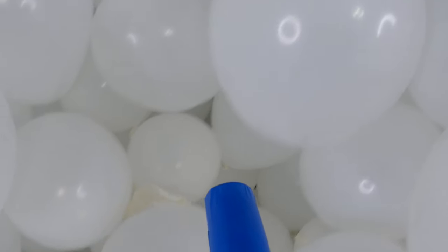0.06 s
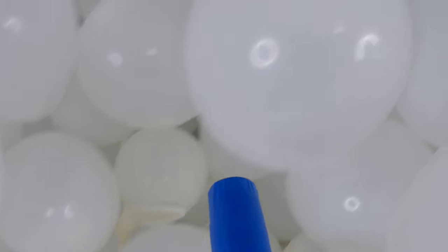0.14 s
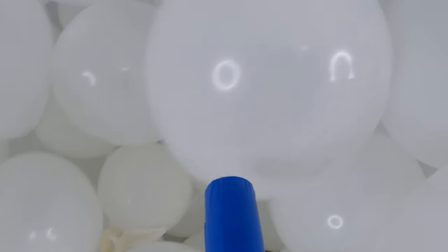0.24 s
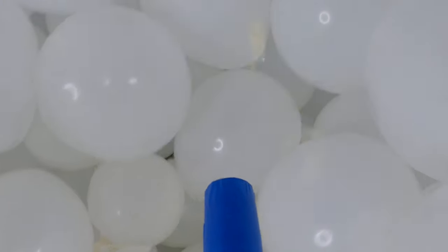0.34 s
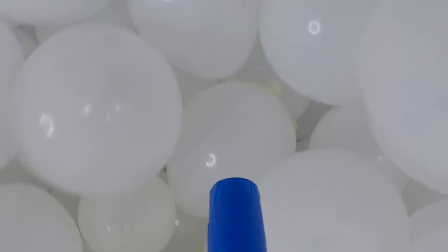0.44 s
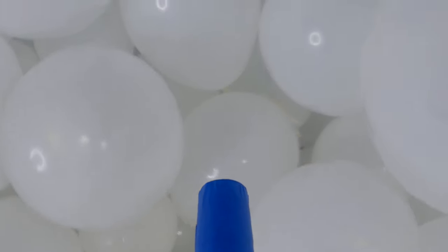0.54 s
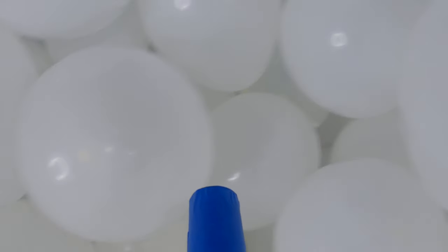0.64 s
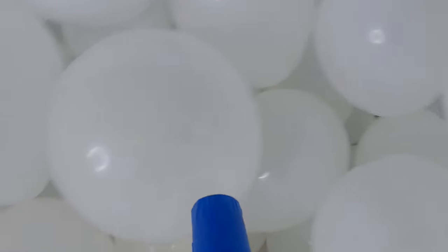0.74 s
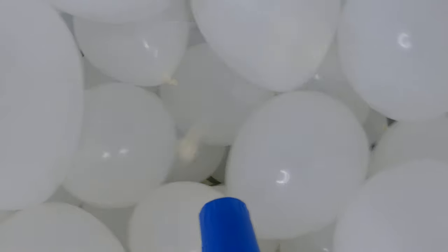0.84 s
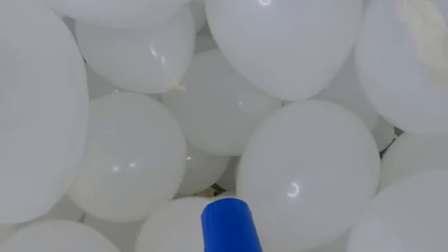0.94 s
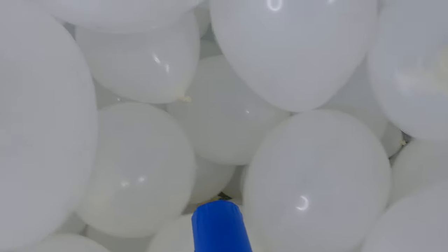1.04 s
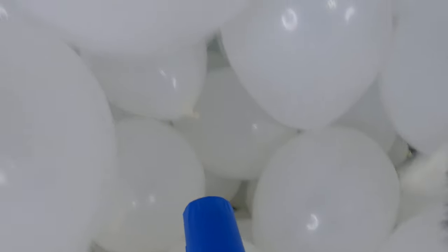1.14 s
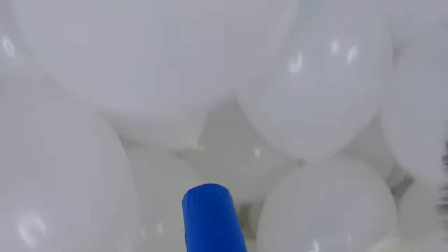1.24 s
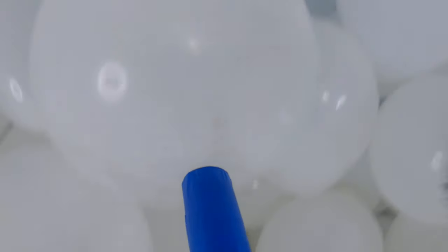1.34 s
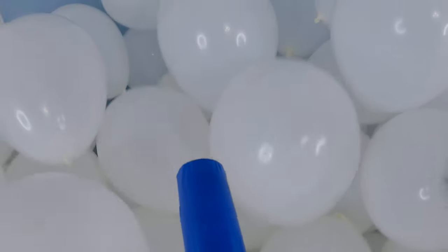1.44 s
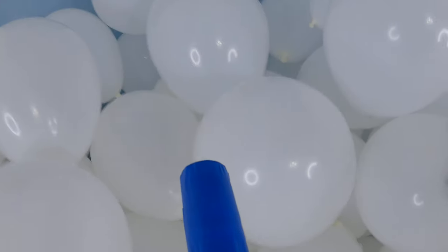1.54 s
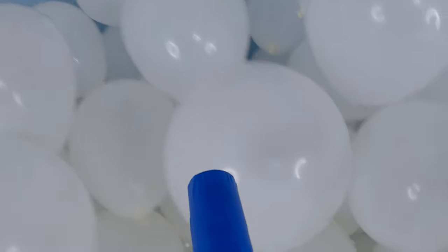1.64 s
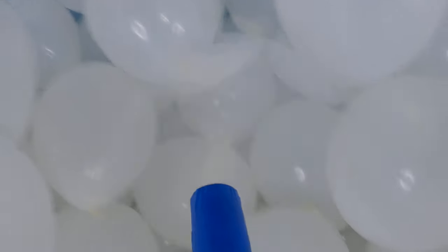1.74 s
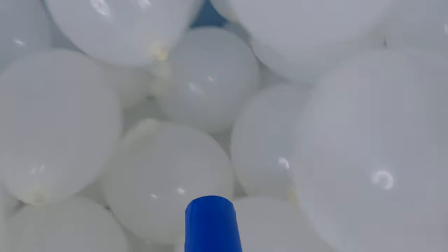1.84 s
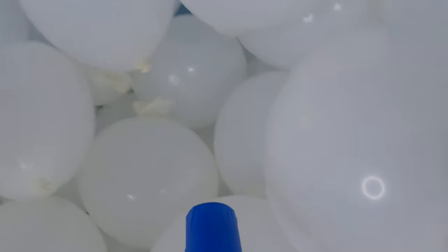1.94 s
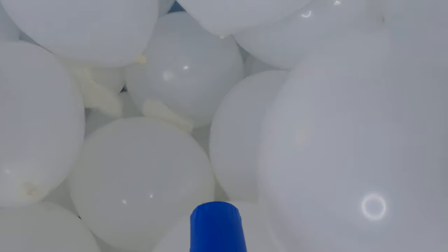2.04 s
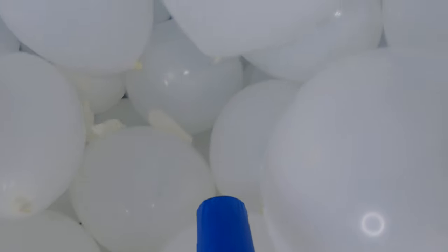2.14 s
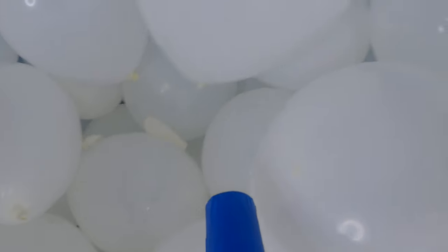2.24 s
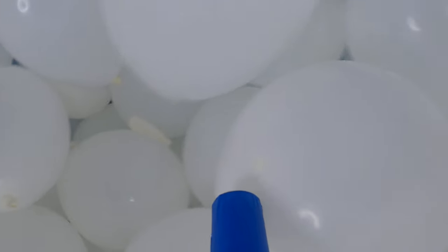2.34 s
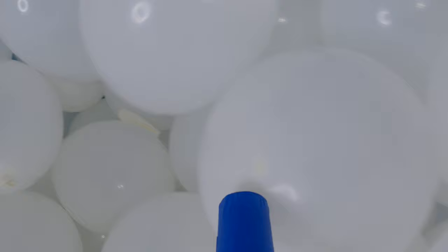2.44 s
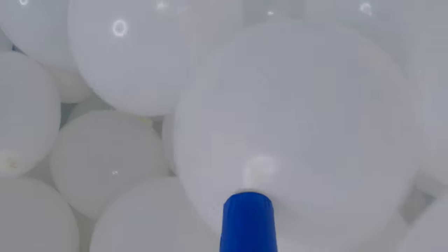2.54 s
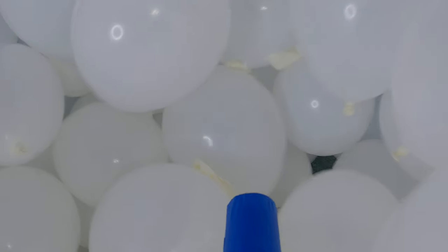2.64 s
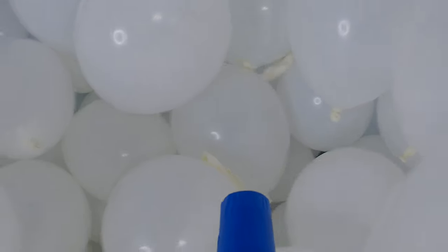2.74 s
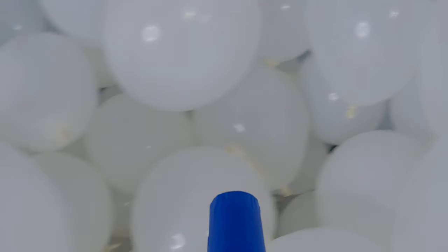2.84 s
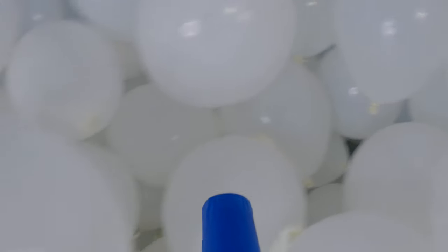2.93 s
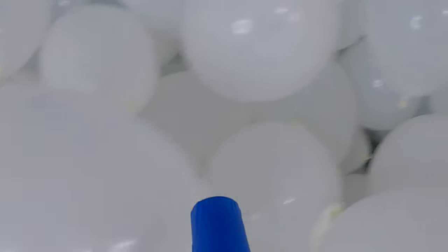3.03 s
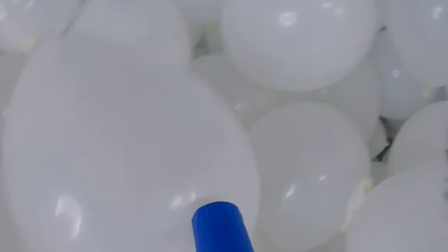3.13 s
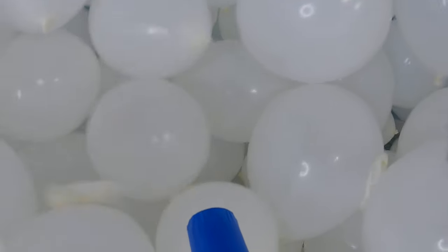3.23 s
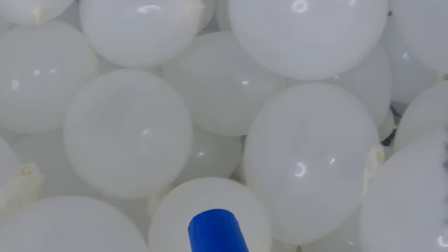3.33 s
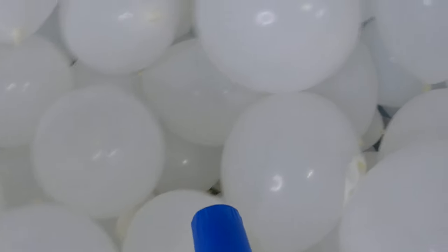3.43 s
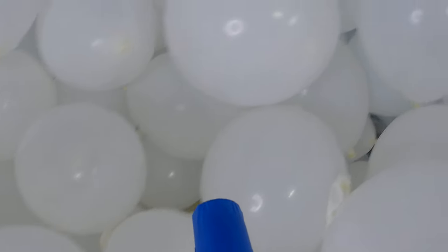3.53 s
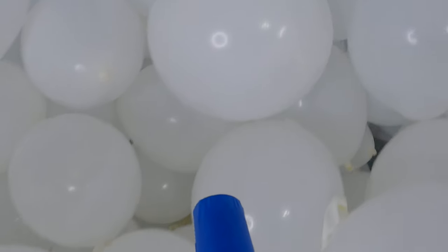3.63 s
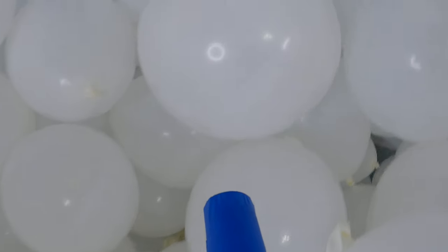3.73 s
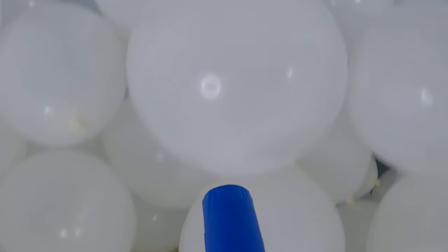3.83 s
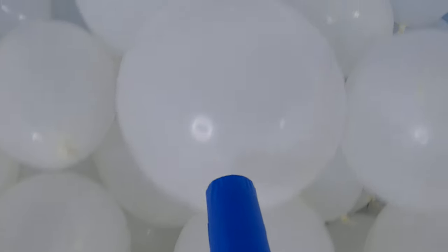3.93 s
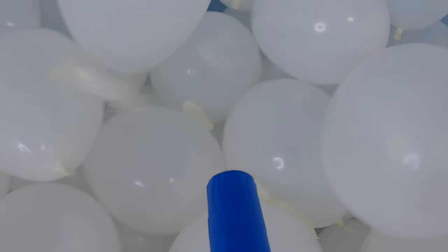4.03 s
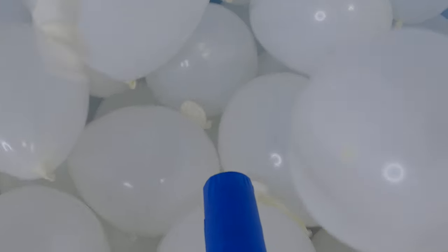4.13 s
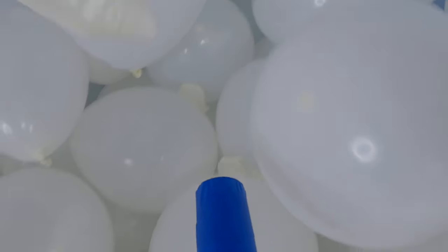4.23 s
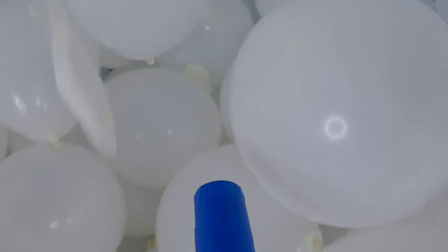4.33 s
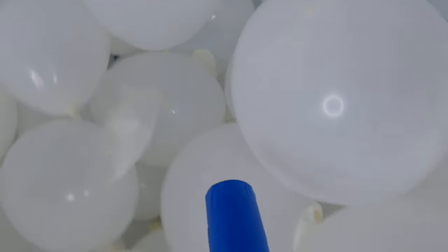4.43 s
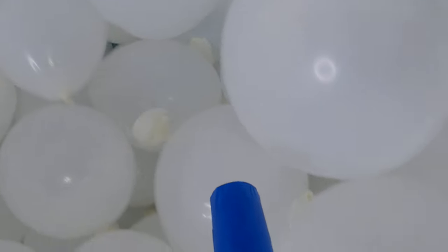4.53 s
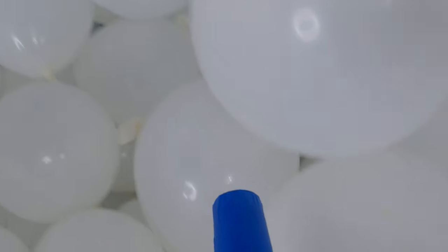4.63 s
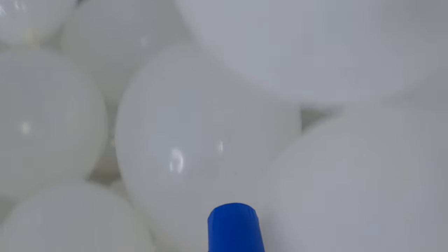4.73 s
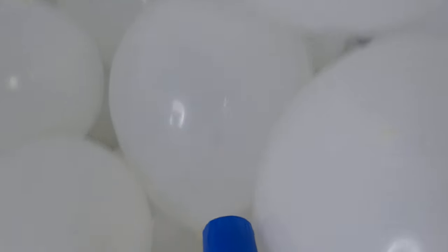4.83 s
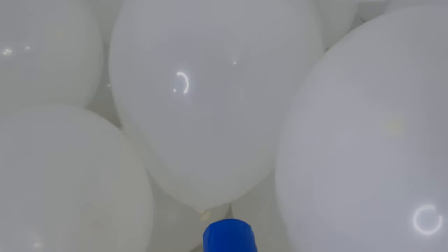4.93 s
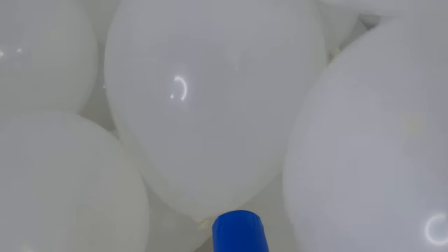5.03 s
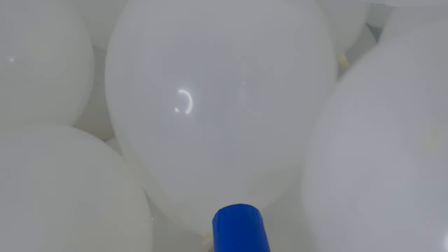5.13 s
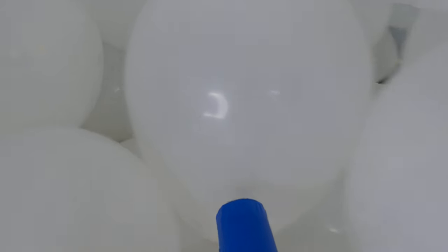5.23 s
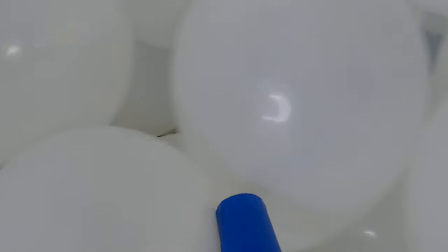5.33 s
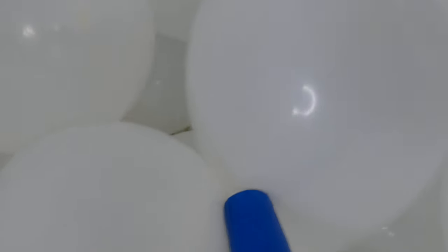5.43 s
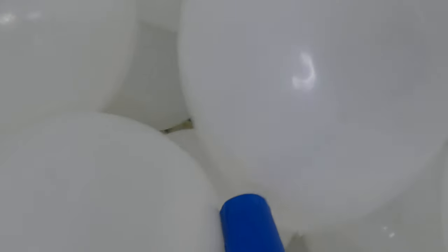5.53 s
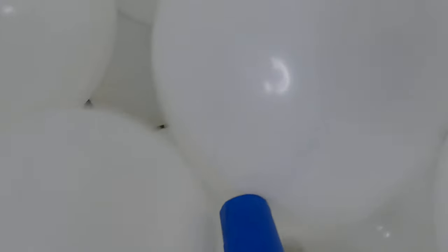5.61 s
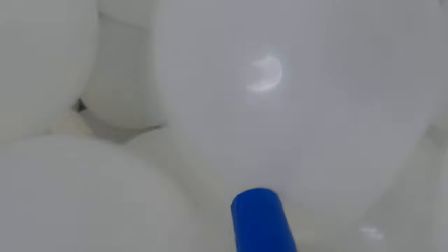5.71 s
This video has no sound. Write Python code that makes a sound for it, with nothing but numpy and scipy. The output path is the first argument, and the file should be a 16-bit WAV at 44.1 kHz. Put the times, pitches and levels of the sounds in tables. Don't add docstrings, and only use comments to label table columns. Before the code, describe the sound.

Hissing shop-vacuum suction with faint thin whistles, heard very near and nearly mono. Balloons burst singly at its rim over about four seconds, hard, slightly overloaded cracks with low booms and hollow echoes from surrounding balloons. Automatic gain pulls the hiss down around each pop, then lets it recover. After a longer stretch of suction, rubber slaps, short rising squeaks and growing low gusts close the scene.

```python
import sys
import numpy as np
from scipy import signal
from scipy.fft import rfft, irfft, next_fast_len
from scipy.io import wavfile
from scipy.ndimage import uniform_filter1d, map_coordinates

SR = 44100
rng = np.random.default_rng(int(sys.argv[2]) if len(sys.argv) > 2 else 0)


def gain_from_db(level_db):
    decades = np.asarray(level_db, float) / 20
    return 10 ** decades


def persist_wave(psi):
    counts = np.round(np.clip(psi, -1, 1) * 32767).astype(np.int16)
    wavfile.write(sys.argv[1], SR, np.atleast_2d(counts).T)


N = 254456


def shock(u):
    return (u > 0) * (1 - u) * np.exp(-u)


def tear(t, lag, gulp_hz):
    late = np.clip(lag, 0, None)
    shreds = unit(filtered(rng.standard_normal(len(t)), lambda f: 1 / (1 + (f / 9500) ** 4)))
    jolt = gain_from_db(-7) * shock(t / .0003) + gain_from_db(-10.5) * shreds * gain_from_db(-60 * t / .012)
    gulp = gain_from_db(-3 + 9 * np.log2(gulp_hz / 500)) * ring(t, gulp_hz, t60=0.03, attack=0.00013)
    snap = shock(late / 0.0014)
    crackle = gain_from_db(-6.5) * (late > 0) * shreds * gain_from_db(-60 * late / 0.03)
    crack = gain_from_db(-3) * (snap + crackle)
    heave_shape = np.exp(-np.where(lag < 0, (lag / .001) ** 2, lag / .003))
    heave = gain_from_db(-6.5) * np.cos(2 * np.pi * 270 * lag) * heave_shape
    return jolt + gulp + crack + heave


# (f/Hz, level/dB)
HEAP = [(180, -6), (300, -1), (405, -13.5), (636, 0), (752, -2), (1100, -7), (1420, -7.5), (2380, -13.5),
        (2910, -12.5), (3440, -16.5), (7790, -19), (14000, -27), (16200, -45)]
# (f/Hz, t60/s)
HEAP_T60 = [(300, 0.15), (800, 0.12), (1400, 0.36), (2500, 0.42), (6000, 0.37), (14000, 0.22)]


def heap(t):
    hz, frame, z = signal.stft(rng.standard_normal(len(t)), SR, nperseg=128)
    z = z * gain_from_db(-60 * frame / along(HEAP_T60, hz)[:, None])
    x = signal.istft(z, SR, nperseg=128)[1][:len(t)]
    x = filtered(x, lambda f: gain_from_db(along(HEAP, f)))
    return x / np.sqrt(np.mean(x[:SR // 50] ** 2))


def heap_answer(t, lag, gap_hz, boom_db, thud_db, skin_db, gap_db):
    late = np.clip(lag, 0, None)
    swell = np.where(late > 0, 1 - 0.66 * np.exp(-late / 0.001), .25)
    clumps = gain_from_db(1.85 * unit(uniform_filter1d(rng.standard_normal(len(t)), size=90)))
    echoes = gain_from_db(-12.5) * swell * clumps * heap(t)
    boom = gain_from_db(boom_db + 8.5) * ring(late, 86, t60=0.14, attack=0.00062)
    skin = gain_from_db(skin_db + 6) * ring(late, 270, t60=0.17, attack=0.0031)
    sag = lambda f: 1 / (1 + (125 / (f + 1)) ** 6) / (1 + (f / 235) ** 6)
    thud = gain_from_db(thud_db + 4) * swell * band(t, sag, t60=0.15)
    cavity = lambda f: 1 / (1 + ((f - gap_hz) / 204) ** 2)
    hollow = gain_from_db(gap_db - 5) * swell * band(t, cavity, t60=0.32)
    return echoes + hollow + boom + thud + skin


# (first jolt t/s, crack t/s, gulp f/Hz, hollow f/Hz)
BURSTS = [
    (.4258, .4286, 500, 1300),
    (.9511, .9545, 420, 1270),
    (1.4703, 1.4731, 520, 1600),
    (1.8588, 1.862, 400, 1600),
    (2.6818, 2.685, 450, 1350),
    (3.2876, 3.2908, 330, 1450),
    (4.1063, 4.1106, 300, 1750),
]
# (peak level/dB, boom level/dB, thud level/dB, skin ring level/dB, hollow level/dB)
ANSWERS = [
    (-2.5, -11, -20, -24.5, -17.5),
    (-4, -22, -11.5, -11, -12),
    (-2.5, -21, -19.5, -21, -14),
    (-2.5, -14, -15, -22, -10),
    (-2.5, -14.5, -13, -23, -17),
    (-1.5, -32.5, -18.5, -16, -10.5),
    (-2.5, -28, -20, -24, -10.5),
]


def bursts():
    out, t = np.zeros(N), np.arange(SR // 2) / SR
    for (s, crack_s, gulp_hz, gap_hz), (db, *answer_db) in zip(BURSTS, ANSWERS):
        lag = t - (crack_s - s)
        pop = tear(t, lag, gulp_hz) + heap_answer(t, lag, gap_hz, *answer_db)
        add(out, s, gain_from_db(db) * pop)
    earlier_age_s = .09
    add(out, 0, gain_from_db(-15) * heap(t)[round(earlier_age_s * SR):])
    return out


# (t/s, peak level/dB, f/Hz, t60/s, snap
# level/dB)
THUMPS = [(0.53, -17.5, 135, 0.084, -20), (0.9646, -6.5, 1410, 0.028, -9), (1.4566, -3.5, 141, 0.035, -24),
          (2.436, -25, 93.5, 0.066, -22), (2.6423, -18, 220, 0.18, 3), (5.452, -22, 1000, .04, -4),
          (5.493, -20, 86, 0.1, -25), (5.578, -20, 76.6, 0.42, -25), (5.647, -8.5, 86, 0.14, -23),
          (5.732, -13, 80.6, 0.12, -22), (5.757, -14, 90, .1, -20)]


def thumps():
    out, t = np.zeros(N), np.arange(SR // 4) / SR
    for s, db, hz, t60, snap_db in THUMPS:
        push = ring(t, hz, t60, attack=0.00099)
        snap = gain_from_db(snap_db) * band(t, lambda f: 1 / (1 + (f / 9000) ** 4), t60=0.043)
        add(out, s, gain_from_db(db) * (push + snap))
    return out


# (t/s, peak level/dB, f/Hz, length/s, pitch rise/share)
SQUEALS = [
    (5.503, -7.5, 2230, 0.023, 0.083),
    (5.551, -9, 2364, 0.0245, 0.045),
    (5.609, -10.5, 2960, 0.0214, 0.037),
    (5.7115, -8.5, 3235, .016, 0.011),
]


def squeals():
    out, t = np.zeros(N), np.arange(SR // 5) / SR
    hiss_colour = [(1400, -15.5), (2000, -7), (3400, -2), (4050, 1.5), (4800, -3), (6500, -3),
                   (12000, -15.5), (15500, -21), (16500, -70)]
    for s, db, hz, length, rise in SQUEALS:
        turn = 2 * np.pi * np.cumsum(hz * (1 + rise * np.clip(t / length, 0, 2.2))) / SR
        shake = [unit(filtered(rng.standard_normal(len(t)), lambda f: 1 / (1 + (f / 230) ** 2)))
                 for _ in range(2)]
        rasp = shake[0] * np.cos(turn) + shake[1] * np.sin(turn)
        voice = 0.94 * np.cos(turn) + 0.5 * rasp
        hiss = unit(filtered(rng.standard_normal(len(t)), lambda f: gain_from_db(along(hiss_colour, f))))
        fade_in = np.clip(t / 0.0022, 0, 1)
        cut = np.clip((length - t) / 0.0062 + 1, 0, 1)
        on = fade_in * cut * gain_from_db(-3 * t / length)
        after = np.clip(t / length, 0, 1) * gain_from_db(-60 * t / .3)
        tone = voice * on + gain_from_db(-3.5) * rasp * after
        air = gain_from_db(-3.5) * hiss * (on + gain_from_db(-2.5) * after)
        add(out, s, gain_from_db(db - 6.5) * (tone + air))
    return out


def suction():
    jet_db, fizz_db = seals()
    flutter = wobble(22)
    rim = jet(flutter) + fizz(flutter, fizz_db) + motor(fizz_db) + whistles()
    return gain_from_db(gain_db()) * (gain_from_db(-21.3 + jet_db) * rim + wind())


# (t/s, rise/s, jet level/dB, fizz level/dB)
SEALS = [
    (0.405, .04, 2, 0),
    (2.62, .07, 4, 7),
    (2.645, .035, -4, 18),
    (2.68, .02, 7, 3),
    (3.27, .1, 2, 3),
    (5.47, .2, -.5, 3),
]


def seals():
    t = np.arange(N) / SR
    near = np.array([np.interp(t, [s - rise, s, s + .05], [0, 1, 0]) for s, rise, *_ in SEALS])
    return np.array(SEALS)[:, 2:].T @ near


# (f/Hz, level/dB)
JET = [(880, -44), (1500, -19), (2120, -13), (2640, -6), (2860, -3.5), (3230, -1.5), (3700, 0.5),
       (4880, -10), (6310, -21), (7000, -61.5), (9100, -102), (15400, -120)]


def jet(flutter):
    return gain_from_db(1.2 + 0.31 * flutter + 0.37 * wobble(40)) * hose(patchy_noise(JET, patchy_db=0.93))


# (f/Hz, level/dB)
FIZZ = [(3060, -41), (5200, -10), (6290, -3.5), (7290, -8.5), (9710, -4), (10900, -11.5), (13400, -12),
        (15100, -22), (16200, -45)]


def fizz(flutter, seal_db):
    return gain_from_db(-9.7 + seal_db + .6 * flutter) * hose(patchy_noise(FIZZ, patchy_db=.9))


# (f/Hz, level/dB)
RUSH = [(120, -32), (200, -10), (270, -7.5), (591, -8.5), (644, -3.5), (1880, -8), (2600, -8.5),
        (3380, -27), (5720, -120)]


def motor(seal_db):
    return gain_from_db(-9.3 + .5 * seal_db + .8 * wobble(9)) * hose(patchy_noise(RUSH, patchy_db=0.5))


# (delay/s, share)
HOSE = [
    (.0112, 0.41),
    (0.0077, 0.14),
    (.0035, 0.05),
]


def hose(x):
    def comb(hz):
        echoes = sum(np.clip(g, 0, .33) * np.exp(-2j * np.pi * hz * s) for s, g in HOSE)
        return 1 / (1 - echoes)
    return unit(filtered(x, comb))


# (start t/s, end t/s, f/Hz, level/dB re jet)
WHISTLES = [
    (0.15, 0.3, 370, -9),
    (0.681, 0.858, 2730, -2),
    (2.443, 2.6, 2680, -4.5),
    (3.489, 3.718, 2670, -1.5),
    (4.8, 4.953, 3310, -2),
    (5.15, 5.3, 3240, -2),
]


def whistles():
    out = np.zeros(N)
    for start, end, hz, db in WHISTLES:
        size = round((end - start) * SR)
        pitch = hz * (1 + 0.0026 * wobble(31)[:size])
        tone = np.sin(2 * np.pi * np.cumsum(pitch) / SR)
        add(out, start, gain_from_db(db) * np.sqrt(np.hanning(size)) * tone)
    return out


# (start t/s, depth level/dB)
DUCKS = [(-0.12, 19.5), (0.408, 20.5), (0.938, 20), (1.453, 20.5), (1.843, 22), (2.661, 22), (3.273, 20.5),
         (4.093, 20.5), (5.488, 11), (5.546, 14), (5.61, 17)]


def gain_db():
    fall_s, hold_s = .012, .19
    quick_share, quick_s, creep_s = .39, .15, 1.4
    t, ducks = np.arange(N) / SR, []
    for s, depth_db in DUCKS:
        since = np.clip(t - s - hold_s, 0, None)
        quick = quick_share * np.exp(-since / quick_s)
        creep = (1 - quick_share) * np.clip(1 - since / creep_s, 0, 1)
        ducks.append(depth_db * np.clip((t - s) / fall_s, 0, 1) * (quick + creep))
    return -np.max(ducks, axis=0)


# (f/Hz, level/dB)
LUMPS = [(21, -52), (35, -26), (56, -15.5), (81, 0), (178, -13), (200, -20), (260, -39), (440, -120)]
# (f/Hz, level/dB)
FLAPS = [(82, -12), (140, 4.5), (440, -2.5), (472, -8), (839, -14), (900, -43), (1170, -37), (1980, -120)]
# (t/s, level/dB)
STREAM = [(0, -33), (.25, -38), (.38, -32), (.75, -40), (.9, -46), (1.2, -41), (1.7, -44), (2.2, -42),
          (2.37, -43), (2.6, -34), (3.1, -45), (3.6, -42), (4.0, -43), (4.55, -42), (4.8, -33), (4.95, -28),
          (5.4, -32), (5.77, -28)]
# (t/s, deep level/dB, flapping level/dB re deep, rise/s, fall/s for 20 dB)
GUSTS = [(0, -14, -11, .1, .1), (.298, -31, -6, .05, .06), (.55, -13, -11, .1, .12),
         (.78, -42, -4, .05, .05), (1.06, -29, -8, .1, .12), (1.98, -19, -10, .1, .2),
         (2.13, -30, -9, .1, .1), (2.3, -38, -10, .06, .06), (2.44, -29, -9, .04, .4),
         (2.8, -22, 1, .1, .15), (3.19, -35, -11, .03, .1), (3.4, -26, -15, .08, .15),
         (4.23, -31, -13, .08, .12), (4.77, -36, -7, .1, .1), (5.06, -28, -9, .2, .3),
         (5.44, -27, -8, .05, .06), (5.53, -15, -16, .04, .12), (5.66, -7, -25, .06, .08),
         (5.77, 2, -29, .06, .1)]


def wind():
    t = np.arange(N) / SR
    lumps = unit(gain_from_db(2.94 * wobble(25)) * patchy_noise(LUMPS, patchy_db=1.5))
    flaps = unit(gain_from_db(1.9 * wobble(30)) * patchy_noise(FLAPS, patchy_db=-1.0))
    flap = gain_from_db(np.interp(t, *np.transpose(STREAM)))
    deep = gain_from_db(-1) * flap
    for s, db, flap_db, rise, fall in GUSTS:
        gust = gain_from_db(db - 20 * np.maximum((s - t) / rise, (t - s) / fall))
        deep = deep + gust
        flap = flap + gain_from_db(flap_db) * gust
    return gain_from_db(-2.1) * deep * lumps + flap * flaps


def ring(t, hz, t60, attack):
    drift = np.cumsum(uniform_filter1d(rng.standard_normal(len(t)), size=400)) * .03
    return -np.sin(2 * np.pi * hz * t + drift) * gain_from_db(-60 * t / t60) * (1 - np.exp(-t / attack))


def band(t, shape, t60):
    x = filtered(rng.standard_normal(len(t)), shape)
    return x / np.sqrt(np.mean(x[:SR // 30] ** 2)) * gain_from_db(-60 * t / t60)


def patchy_noise(spectrum, patchy_db):
    z = signal.stft(rng.standard_normal(N + 512), nperseg=512)[2]
    field = uniform_filter1d(rng.standard_normal(z.shape), size=5, axis=0)
    field = uniform_filter1d(field, size=8, axis=1)
    x = signal.istft(z * gain_from_db(patchy_db * unit(field)), nperseg=512)[1][:N]
    return unit(filtered(x, lambda hz: gain_from_db(along(spectrum, hz))))


def wobble(rate):
    return map_coordinates(rng.standard_normal(int(N * rate / SR) + 4), [np.arange(N) * rate / SR])


def filtered(x, response):
    m = next_fast_len(len(x) + 8192)
    return irfft(rfft(x, m) * response(np.fft.rfftfreq(m, 1 / SR)), m)[:len(x)]


def along(points, hz):
    f, v = np.transpose(points)
    return np.interp(np.log(hz + 1), np.log(f + 1), v)


def unit(x):
    return x / np.sqrt(np.mean(x ** 2) + 1e-20)


def add(track, s, sound):
    part = track[round(s * SR):][:len(sound)]
    part += sound[:len(part)]


def scene():
    x = bursts() + thumps() + squeals() + suction()
    scramble = rng.standard_normal(256) / 16
    moments = gain_from_db(-17) * np.clip(3 * wobble(12) - 2, 0, 1)
    apart = moments * np.convolve(np.diff(x, prepend=0) + .3 * x, scramble)[:N]
    return np.array([x + apart, x - apart])


def roll_off(x):
    return signal.sosfilt(signal.butter(12, 16400, fs=SR, output="sos"), x)


def record(dry):
    x = signal.sosfilt(signal.butter(4, 55, "high", fs=SR, output="sos"), dry)
    x = signal.sosfilt(signal.butter(10, 15300, fs=SR, output="sos"), x)
    x = x / (1 + np.abs(x / 1.02) ** 10) ** (1 / 10)
    return roll_off(x)


dry = scene()
out = record(dry)
persist_wave(out)
```